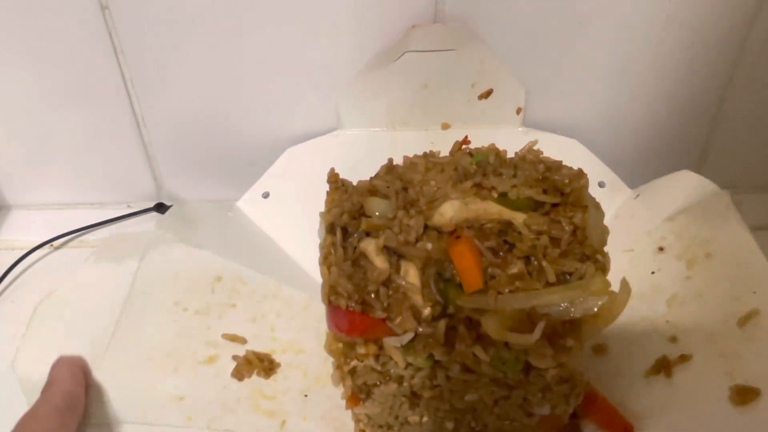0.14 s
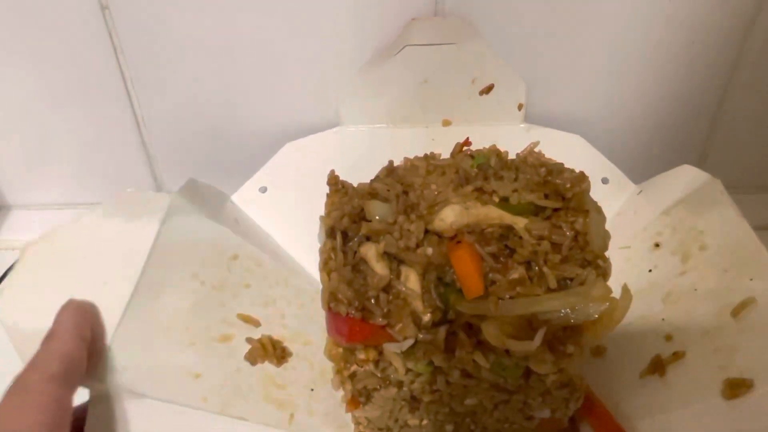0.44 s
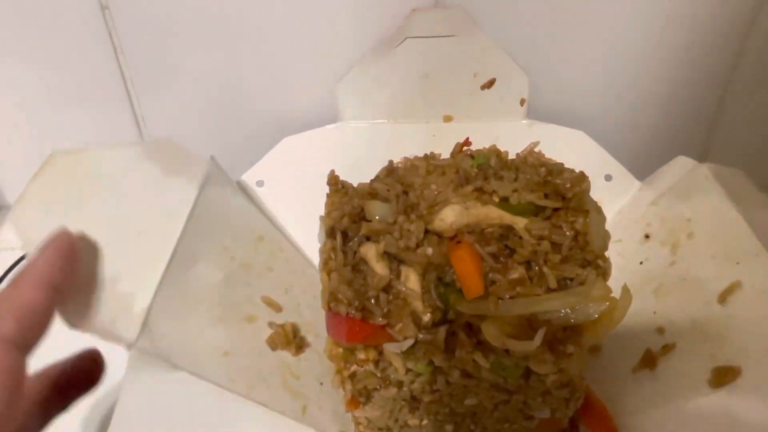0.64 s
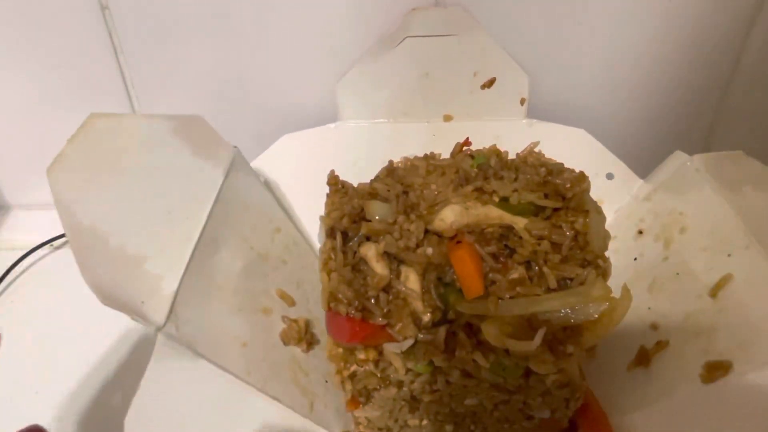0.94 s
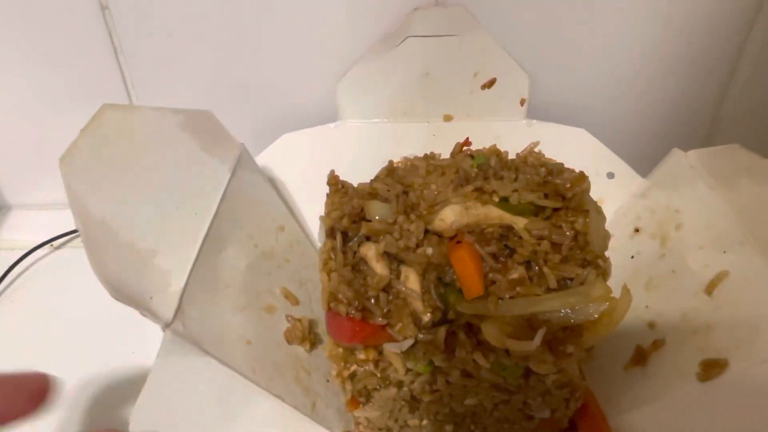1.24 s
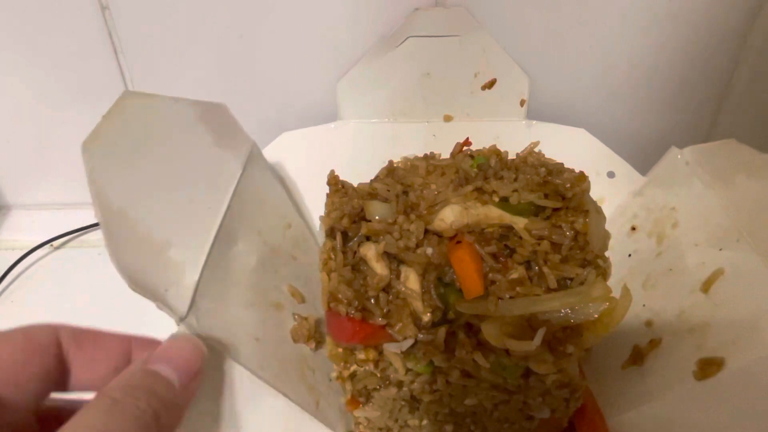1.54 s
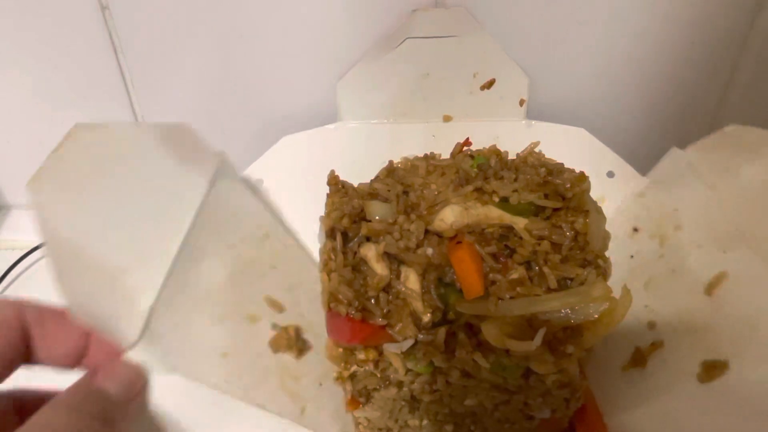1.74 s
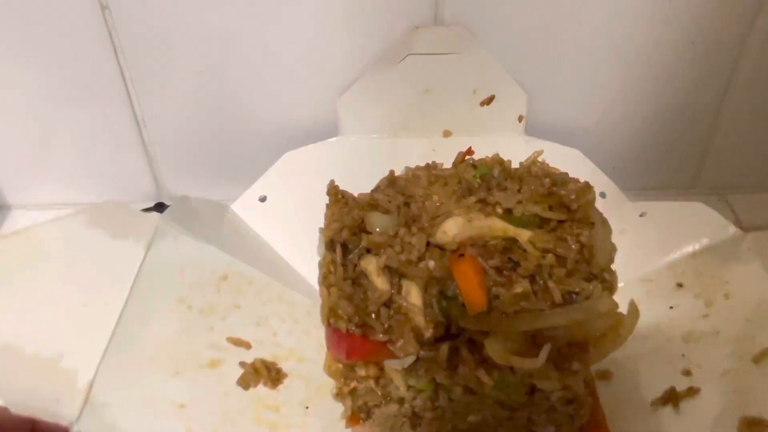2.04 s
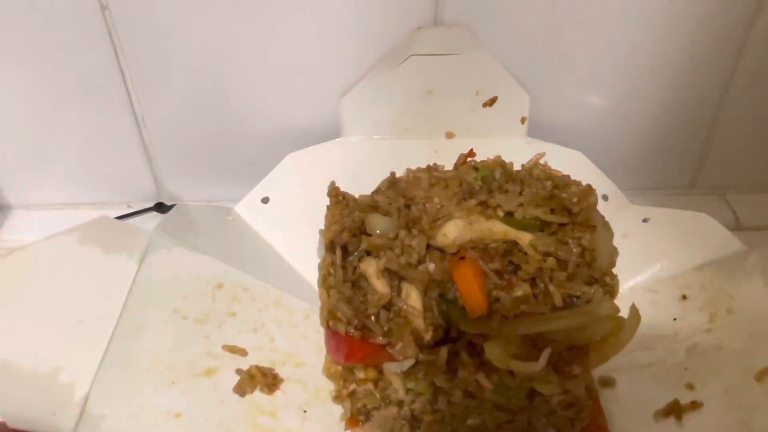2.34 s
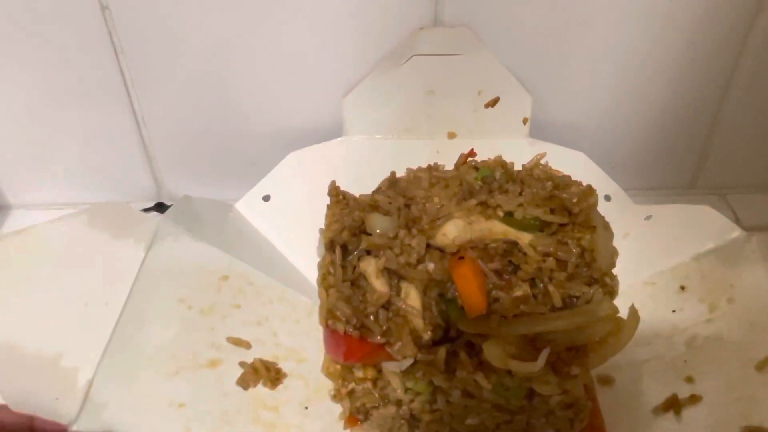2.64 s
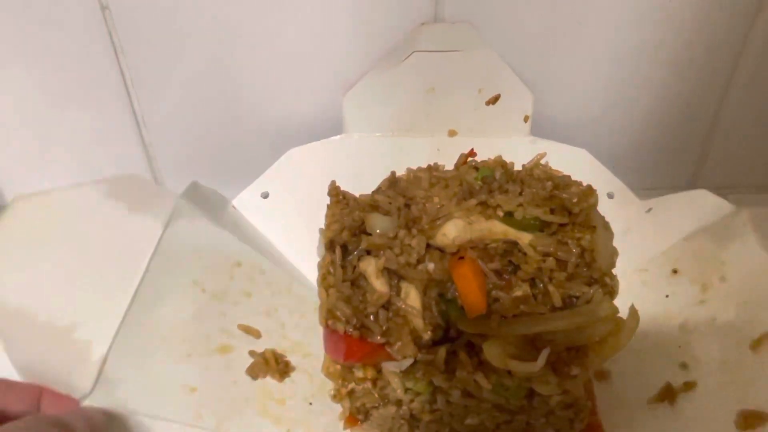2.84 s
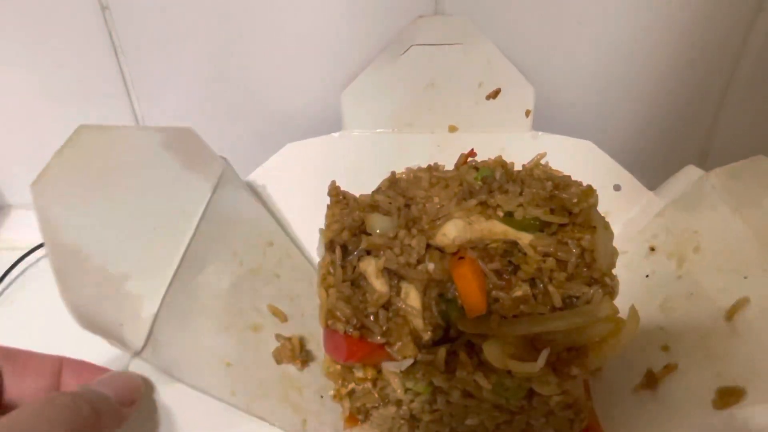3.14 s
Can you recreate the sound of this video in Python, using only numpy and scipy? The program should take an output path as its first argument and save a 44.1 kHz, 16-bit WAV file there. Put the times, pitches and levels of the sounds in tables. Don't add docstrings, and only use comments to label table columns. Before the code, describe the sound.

Fingers rub and fold a stiff carton flap, starting softly, then crackling and popping busily with a hard snap and tiny wire ring, ending with light touches over steady fridge hum, recorded close indoors by phone.

```python
import sys
import numpy as np
from scipy import signal
from scipy.fft import rfft, irfft, next_fast_len
from scipy.io import wavfile
from scipy.ndimage import uniform_filter1d, map_coordinates

SR = 44100
rng = np.random.default_rng(int(sys.argv[2]) if len(sys.argv) > 2 else 0)


def boost_factor(decibels):
    exponent = np.asarray(decibels, float) / 20
    return 10 ** exponent


def transcribe(u):
    v = np.clip(np.atleast_2d(u).T, -1, 1)
    q = np.round(v * 32767).astype(np.int16)
    wavfile.write(sys.argv[1], SR, q)


N = 145089
T = np.arange(N) / SR

# f/Hz, width/Hz, level/dB, steady share
FRIDGE_HUM = [(99.96, 6.975, -55.5, 0.58), (160.54, 3.01, -55, 0.8), (197.1, 2.987, -54, .9),
              (320.7, 2.99, -69, .8), (396.8, 8.7, -75, 0.36), (3410, 120, -98, .05)]
# f/Hz, level/dB
MOTOR_WHINE = [(1577, -99), (1873, -97.5), (2957, -97), (3303, -82), (3352, -99.5), (3402, -99),
               (3451, -90.5), (3647, -99), (5335, -102), (5572, -103)]
# f/Hz, density/dB per Hz
RUMBLE_COLOUR = [(13, -47), (22, -19), (53, -10), (90, -7), (193, -6), (219, -14.5), (248, -11), (499, -22),
                 (900, -41.5), (1170, -65.5), (1980, -120)]
# f/Hz, density/dB per Hz
HISS_COLOUR = [(410, -55), (700, -15), (1240, -8), (2630, -14.5), (3410, -7.5), (4420, -16.5),
               (5370, -17.5), (15600, -37)]
RUMBLE_DB, HISS_DB = -53.5, -79.5

# f/Hz, t60/s
TILE_DECAY = [(300, 0.17), (2000, 0.16), (10000, 0.18)]
ROOM_DB = -15

# t/s, pressure as level/dB, sliding speed as brightness/dB
FINGER = [(0, -71.5, -1), (.18, -69, -1.5), (.3, -82, -5), (1.12, -83.5, 0), (1.15, -80.5, 6.5),
          (1.34, -77.5, -7), (1.4, -61, 2), (1.55, -62.5, 6.5), (1.801, -55, 2), (1.93, -66, -3.5),
          (2.06, -58.5, 7.5), (2.16, -67, 5), (2.3, -63, -0.5), (2.41, -88, -5), (2.72, -81, -2),
          (2.8, -73, 2), (2.95, -69.5, -5.5), (3.02, -81, -3.5)]
# f/Hz, density/dB per Hz
BOARD_COLOUR = [(240, -25), (400, 6.5), (1490, -5.5), (1910, -6.5), (2290, -8), (6200, -18.5),
                (8050, -17.5), (11800, -22.5), (15600, -28)]
# f/Hz, width/Hz, level/dB
FLAP_MODES = [(1300, 200, -1), (1970, 170, 5), (5600, 900, 0)]
GRIT_PER_S, GRIT_DB, GRIT_SPREAD_DB = 550, -11, 2
PATCHY_DB, SPLIT_HZ = 2.2, 2760

# peak t/s, length/s, level/dB,
# centre f/Hz, tone over hiss/dB
SLIPS = [(.238, 0.055, -64.5, 1870, -0.5), (.85, 0.11, -91.5, 1700, 11), (0.87, 0.17, -94.5, 2620, 11.5),
         (2.86, .05, -76, 3600, -0.5), (1.5, .14, -78.5, 1900, 11.5), (1.55, .1, -76, 5200, 6),
         (1.68, 0.065, -71, 4400, 5), (1.8, .12, -72.5, 1850, 11.5), (1.85, .05, -67.5, 1300, 5.5),
         (2.01, .05, -65, 2000, 3.5), (2.26, .07, -72.5, 3240, 3), (0.365, 0.07, -83, 1330, 11.5),
         (.95, 0.34, -85, 774, 17), (1.374, 0.018, -46, 1920, 3), (1.38, 0.024, -64.5, 450, 15),
         (1.376, 0.02, -61, 1120, 13), (.12, .2, -83.5, 1800, 11), (.25, .1, -79.5, 560, 18),
         (2.107, 0.055, -55, 3300, -8), (1.62, 0.041, -74.5, 150, 24), (1.69, 0.24, -77, 614, 12),
         (1.9, 0.087, -74, 164, 25.5), (2.773, 0.054, -70.5, 960, 4.5), (2.938, 0.059, -73, 950, 1.5),
         (3.136, 0.04, -70, 2100, -13), (3.145, 0.046, -83, 1950, 8.5), (2.375, .08, -75.5, 770, 6.5)]
# peak t/s, length/s, level/dB
BRUSHES = [
    (0.487, 0.011, -84.5),
    (1.372, .016, -57.5),
    (1.781, 0.0078, -61.5),
    (1.971, 0.0029, -71),
    (2.2, 0.019, -71),
    (2.353, 0.021, -83),
]
BRUSH_ASIDE_DB = 16

# t/s, level/dB, tilt/dB per kHz above 4800 Hz, share of full ring time
HANDLE_KNOCKS = [
    (1.818, -55.5, -2, 0.76),
    (1.886, -60, -4, .7),
    (1.9165, -53.5, 0, 0.69),
    (1.9817, -42.5, 0.5, 1.07),
]
# f/Hz, level/dB, t60/s
WIRE_MODES = [(3080, -1, .07), (3925, -5, .04), (4790, 0, .1), (4822, -5, .13), (5728, 0, .07),
              (5762, -6, .09), (6760, -1, .075), (6790, -8, .07), (9000, -11, .08), (11500, -20, .04),
              (12850, -19, .045)]

# t/s, peak level/dB, panel pitch f/Hz, brightness/dB, t60/s
POPS = [(.572, -69, 1050, -13, .012), (.855, -60, 800, -12, 0.012), (.887, -62, 5080, -3, 0.0069),
        (1.131, -53.5, 3010, 4.5, 0.012), (1.2527, -38.5, 411, -12.5, 0.057),
        (1.2521, -42.5, 1067, -2, 0.018), (1.2525, -41, 1870, -15, 0.024), (1.253, -41.5, 2015, -16, .025),
        (1.254, -48, 677, -20, 0.038), (1.362, -54, 2000, -6, .02), (1.369, -43, 1830, -19, 0.031),
        (1.3725, -38.5, 1864, -9, 0.018), (1.3755, -38, 490, -19, 0.042), (1.374, -46, 1055, -19, 0.03),
        (1.377, -45, 1292, -17, 0.031), (1.3763, -32, 2010, -8, 0.024), (1.43, -49.5, 3510, -1, 0.0096),
        (1.543, -52, 1870, -6, .012), (1.572, -54, 1900, 1, .008), (1.618, -43.5, 590, -4, 0.013),
        (1.618, -45.5, 1260, -6, 0.019), (1.675, -44.5, 837, -1, 0.014), (1.7155, -49, 1700, 2, 0.0074),
        (1.766, -45, 1970, -18, 0.017), (1.7795, -46, 1870, -2, .012), (1.8178, -39.5, 1915, -2.5, 0.018),
        (1.8846, -33, 590, -8.5, 0.02), (1.8861, -38, 1046, -11, .014), (1.887, -41.5, 1990, -9, 0.014),
        (1.916, -38, 1505, -5, 0.021), (1.9818, -19.5, 1413, -15, .011), (1.9822, -19.5, 1896, -10, 0.01),
        (1.9824, -23.5, 1630, -13, 0.0076), (1.991, -34.5, 2000, 0.5, 0.011), (2.1087, -49, 1960, 1, .01),
        (2.117, -43.5, 1430, -1.5, 0.011), (2.192, -60, 1110, 0, .01), (2.267, -42, 660, -9, 0.015),
        (2.2675, -42.5, 960, -9, .012), (2.69, -66.5, 1800, 8.5, 0.01), (2.754, -47.5, 1040, -1, 0.013)]
# t/s, level/dB, panel pitch
# f/Hz
FAINT_POPS = [(.217, -55, 2000), (.22, -58, 2460), (.233, -50.5, 1700), (.248, -53, 2480), (.25, -51, 1290),
              (.249, -57, 3290), (.343, -64.5, 1260), (.508, -63, 1100), (.605, -63.5, 1150),
              (.714, -65, 1250), (3.036, -62, 1690), (3.117, -61, 1270), (2.851, -63, 2590)]
FAINT_BRIGHT_DB, FAINT_T60 = -10, 0.017
# pitch ratio, level/dB
PANEL_MODES = [(0.721, -17.5), (0.999, 5), (1.198, -9.5), (1.421, -8.5), (1.6, -6.5), (2.4, -10)]
RISE_S, CRACK_TOP_HZ, CRACK_EDGE_HZ = 0.00092, 8200, 14000
SMEAR_DB, BLOW_LEFT = -5, 0.25

# f/Hz, lead/rad
PORT_LEAD = [(0, 0), (1300, .3), (2600, 0), (5000, -.9), (5700, -5.4), (6200, -6.3), (7600, -9.3),
             (8900, -9.5), (10400, -12.4), (12800, -12.7), (14000, -15.6), (15700, -15.8)]
# f/Hz, likeness
PORT_LIKENESS = [(40, 0.87), (180, 1), (280, .35), (600, 0.27), (1400, 0.31), (3500, 0.32), (6500, 0.74),
                 (8000, 0.94), (14000, 0.87)]
# f/Hz, level/dB
PORT_LEAN = [(100, -1), (300, 3), (700, -1), (2000, 1), (5000, 4.5), (9000, 0.5)]


def unit(x):
    return x / np.sqrt(np.mean(np.abs(x) ** 2) + 1e-20)


def along(points, hz):
    f, value = np.transpose(points)
    return np.interp(np.log(hz + 1), np.log(f + 1), value)


def wobble(rate):
    knots = rng.standard_normal(int(N * rate / SR) + 4)
    return map_coordinates(knots, [T * rate])


def filtered(x, response):
    n = x.shape[-1]
    m = next_fast_len(n + 8192)
    return irfft(rfft(x, m) * response(np.fft.rfftfreq(m, 1 / SR)), m)[..., :n]


def peak(f, hz, width):
    return 1j * f * width / (hz * hz - f * f + 1j * f * width)


def noise(response, n=N):
    return unit(filtered(rng.standard_normal((2, n)), response))


def fridge_hum():
    out = 0
    for hz, width, db, steady in FRIDGE_HUM:
        phase = 1.35 * np.array([wobble(width), wobble(width)])
        tone = np.sqrt(2 * steady) * np.sin(2 * np.pi * hz * T + phase)
        blur = np.sqrt(abs(1 - steady)) * noise(lambda f: peak(f, hz, 1.6 * width) ** 2)
        out = out + boost_factor(db) * (tone + blur)
    return out


def motor_whine():
    out = 0
    for hz, db in MOTOR_WHINE:
        level = boost_factor(db + 1.3 * wobble(2.7))
        phase = 0.5 * np.array([wobble(5), wobble(3.9)])
        out = out + level * np.sin(2 * np.pi * hz * T + phase)
    return out


def fridge():
    rumble = boost_factor(RUMBLE_DB + 0.8 * wobble(3.5)) * noise(lambda f: boost_factor(along(RUMBLE_COLOUR, f)))
    hiss = boost_factor(HISS_DB + 0.23 * wobble(2.1)) * noise(lambda f: boost_factor(along(HISS_COLOUR, f)))
    return fridge_hum() + motor_whine() + rumble + hiss


def tiles(x):
    hz, t, z = signal.stft(rng.standard_normal((2, SR // 2)), SR, nperseg=256)
    decay = boost_factor(-60 * t / along(TILE_DECAY, hz)[:, None])
    tail = signal.istft(z * decay, SR, nperseg=256)[1]
    tail = tail / np.linalg.norm(tail[0])
    return signal.fftconvolve(np.pad(x, (150, 0))[None], tail, axes=1)[:, :N]


def board(f):
    flap = sum(boost_factor(db) * peak(f, hz, width) for hz, width, db in FLAP_MODES)
    return boost_factor(along(BOARD_COLOUR, f)) * np.abs(1 + flap)


def slip(n, db, hz, tone_db):
    tone = noise(lambda f: peak(f, hz, 0.41 * hz) ** 2, n)
    hiss = noise(lambda f: board(f) * f / (f + 0.69 * hz), n)
    return boost_factor(db) * (boost_factor(tone_db) * tone + hiss)


def brush(n, db):
    return boost_factor(db) * boost_factor([[0], [BRUSH_ASIDE_DB]]) * noise(lambda f: board(f) * f / (f + 9000), n)


def slips_and_brushes():
    out = np.zeros((2, N + 2 * SR))
    flutter = np.pad(boost_factor(1.55 * wobble(250)), SR, "reflect")
    touches = [(slip, *row) for row in SLIPS] + [(brush, *row) for row in BRUSHES]
    for sound, s, length, *settings in touches:
        half = int(length * SR) + 64
        middle = round(s * SR) + SR
        at = slice(middle - half, middle + half)
        swell = np.exp(-(2.3 * np.arange(-half, half) / SR / length) ** 2)
        out[:, at] += swell * flutter[at] * sound(2 * half, *settings)
    return out[:, SR:SR + N]


def patchy(x):
    z = signal.stft(x, nperseg=256)[2]
    field = uniform_filter1d(rng.standard_normal(z.shape[1:]), 5, 0)
    field = uniform_filter1d(field, 7, 1)
    return unit(signal.istft(z * boost_factor(PATCHY_DB * unit(field)), nperseg=256)[1][:, :N])


def grit():
    catches = rng.random(N) < GRIT_PER_S / SR
    strength = boost_factor(GRIT_SPREAD_DB * np.minimum(rng.exponential(size=N), 3))
    kicks = catches * strength * np.clip(rng.standard_normal((2, N)), -2, 2)
    return unit(filtered(kicks * boost_factor(2.5 * wobble(40)), board))


def rubbing():
    s, db, bright_db = np.transpose(FINGER)
    sound = patchy(noise(board)) + boost_factor(GRIT_DB) * grit()
    low = filtered(sound, lambda f: 1 / (1 + (f / SPLIT_HZ) ** 2))
    tilt = boost_factor(np.interp(T, s, bright_db))
    pressure = boost_factor(np.interp(T, s, db) + 0.67 * wobble(11.08) + 1.2 * wobble(60))
    return pressure * (low / tilt + (sound - low) * tilt)


def handle_ring(t, tilt_db, ring_share):
    ring = 0
    for hz, db, t60 in WIRE_MODES:
        level_db = db + tilt_db * max(hz - 4800, 0) / 1000 + rng.normal(0, 1.5)
        ring = ring + boost_factor(level_db - 60 * t / (ring_share * t60)) * np.sin(2 * np.pi * hz * t)
    return ring * (1 - np.exp(-t / 0.00027))


def buckle(t, hz, bright_db, t60):
    ratio, share_db = np.transpose(PANEL_MODES)[:, :, None]
    pitch = hz * ratio * (1 + 0.13 * np.log(ratio) * rng.standard_normal(ratio.shape))
    ring = (boost_factor(share_db - 60 * t * ratio / t60) * np.sin(2 * np.pi * pitch * t)).sum(0)

    def crack_colour(f):
        above_pitch = f * f / (f * f + 0.5 * hz * hz)
        dulled = above_pitch / (1 + (f / CRACK_TOP_HZ) ** 2)
        return boost_factor(along(BOARD_COLOUR, f)) * dulled * (f < CRACK_EDGE_HZ)
    fade = boost_factor(-60 * t / 0.0059) + 0.32 * boost_factor(-60 * t / (2.26 * t60))
    crack = boost_factor(bright_db) * fade * noise(crack_colour, len(t))[0]
    return 0.92 * ring * (1 - np.exp(-t / RISE_S)) + crack * (1 - np.exp(-t / 0.00042))


def pops():
    out, t = np.zeros(N + SR), np.arange(SR // 4) / SR
    faint_pops = [(s, db, hz, FAINT_BRIGHT_DB, FAINT_T60) for s, db, hz in FAINT_POPS]
    blows = [(buckle, *row) for row in [*POPS, *faint_pops]]
    blows += [(handle_ring, *row) for row in HANDLE_KNOCKS]
    for sound, s, db, *settings in blows:
        out[round(s * SR):][:len(t)] += boost_factor(db) * sound(t, *settings)
    return out[:N]


def scene():
    blows = pops()
    scatter = unit(rng.standard_normal(90)) * np.hanning(90) / 6
    smear = np.convolve(blows, scatter)[30:N + 30]
    direct = np.array([blows, boost_factor(SMEAR_DB) * smear + BLOW_LEFT * blows])
    return fridge() + boost_factor(ROOM_DB) * tiles(blows) + slips_and_brushes() + rubbing() + direct


def low_pass(x):
    return signal.sosfilt(signal.butter(12, 15700, fs=SR, output="sos"), x)


def record(dry):
    def shares(f):
        turn = np.arccos(np.clip(along(PORT_LIKENESS, f), -1, 1)) / 2
        return np.array([np.cos(turn), np.sin(turn)])
    same, other = filtered(np.pad(dry, ((0, 0), (2048, 2048)), "reflect"), shares)
    side = np.array([[1], [-1]])

    def port(f):
        return boost_factor(side * along(PORT_LEAN, f) / 2) * np.exp(0.5j * side * along(PORT_LEAD, f))
    ports = filtered(np.array([same + other, same - other]), port)[:, 2048:-2048]
    fade_out = np.clip((T[-1] - T) * 200, 0, 1)
    return low_pass(ports * fade_out)


dry = scene()
out = record(dry)
transcribe(out)
```